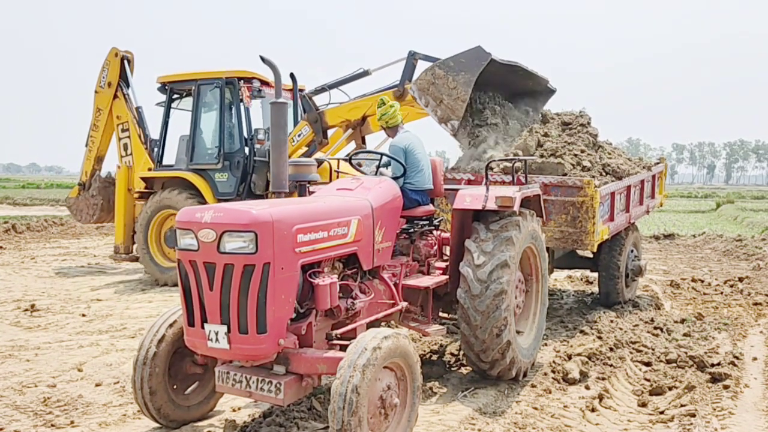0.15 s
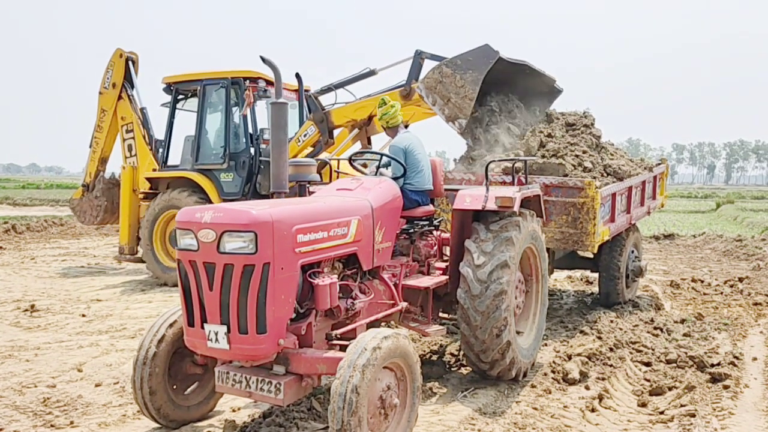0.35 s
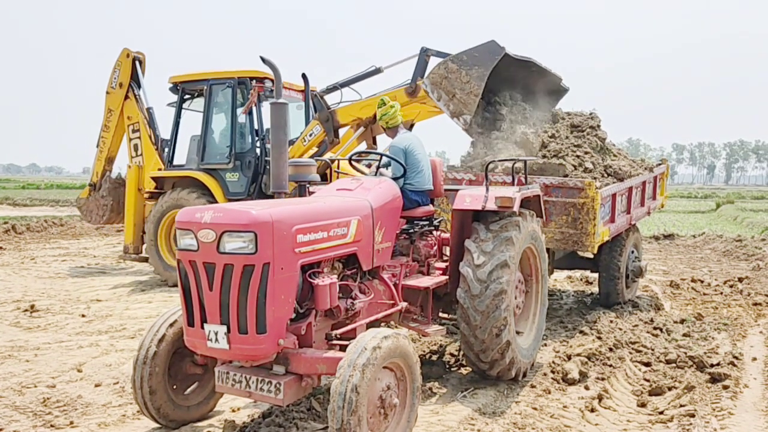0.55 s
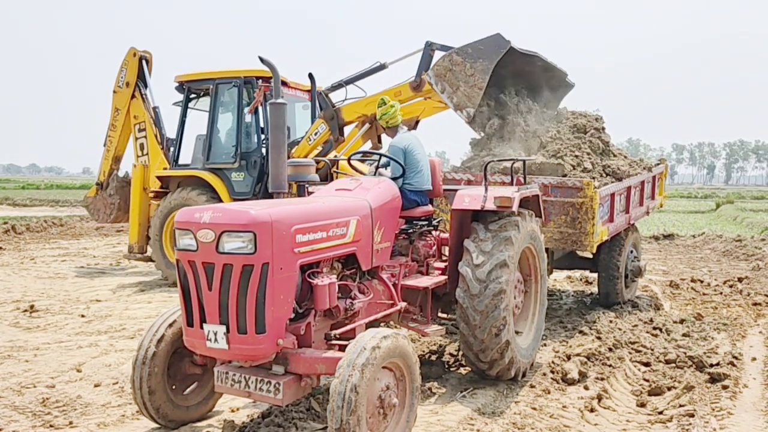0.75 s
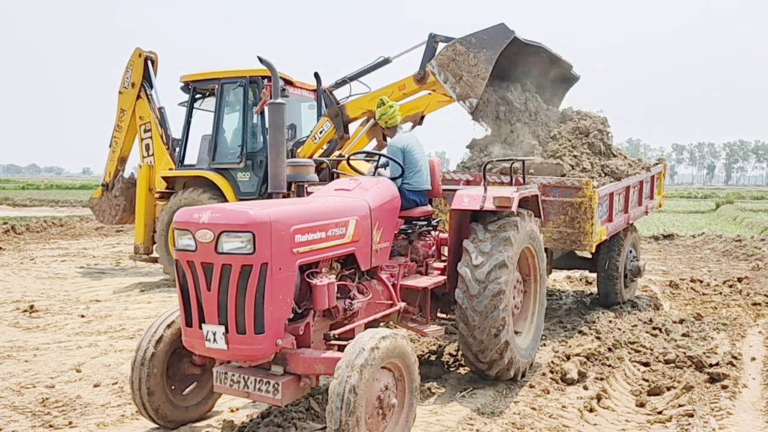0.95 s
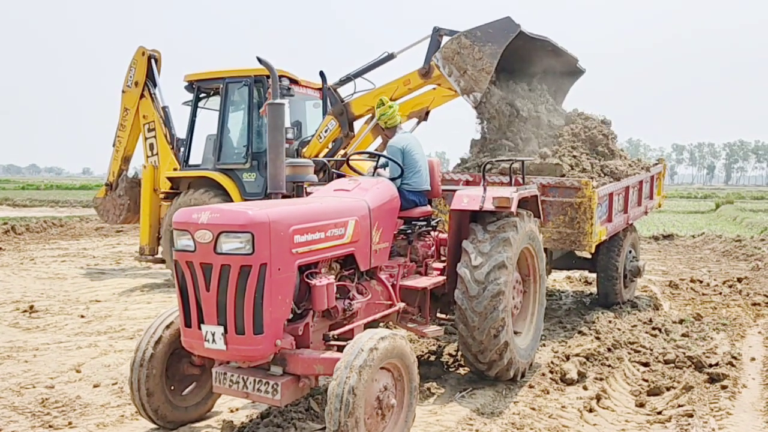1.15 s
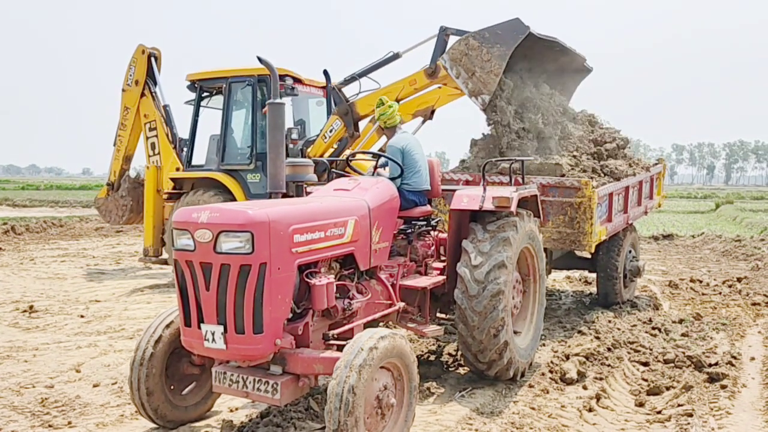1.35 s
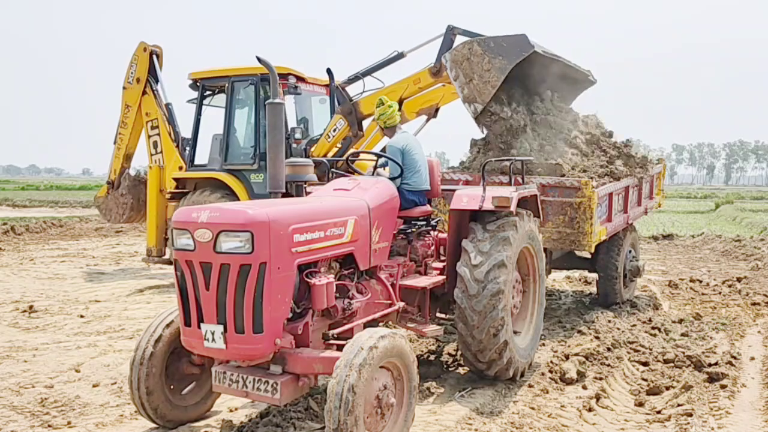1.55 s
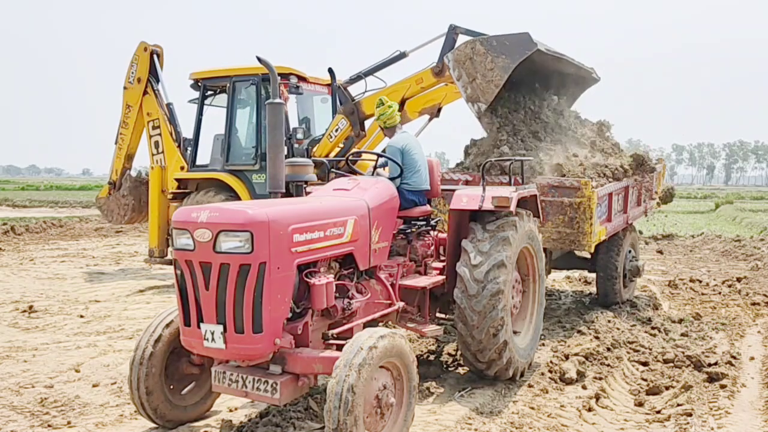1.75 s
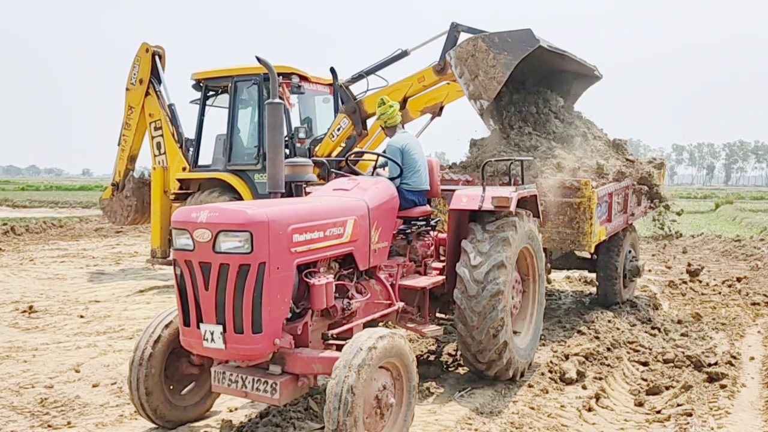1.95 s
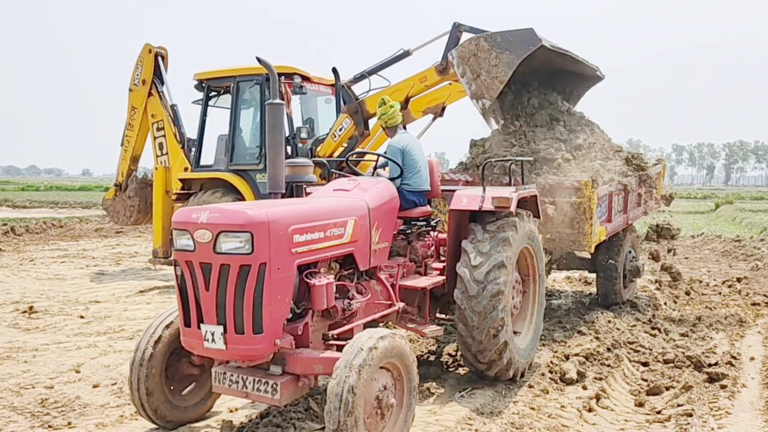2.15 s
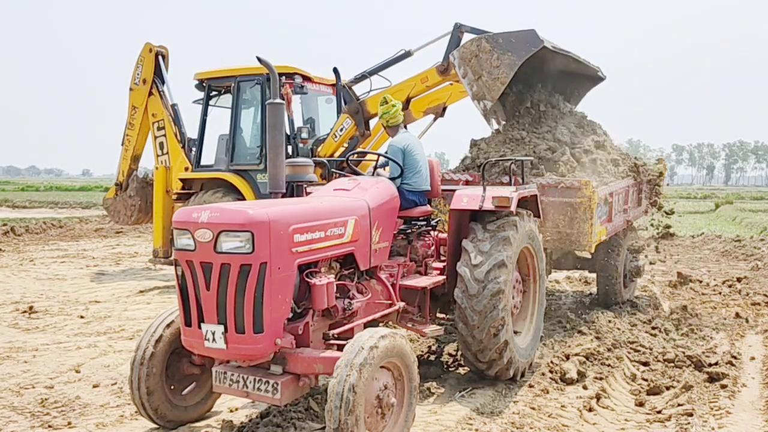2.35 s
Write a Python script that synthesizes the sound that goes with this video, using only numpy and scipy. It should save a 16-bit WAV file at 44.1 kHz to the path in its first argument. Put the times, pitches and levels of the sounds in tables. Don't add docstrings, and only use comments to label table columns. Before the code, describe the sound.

Diesel engine of a loader throbs and revs as its bucket bangs over a steel trailer

```python
import sys
import numpy as np
from scipy import signal
from scipy.fft import rfft, irfft
from scipy.io import wavfile
from scipy.ndimage import uniform_filter1d

SR = 44100
rng = np.random.default_rng(int(sys.argv[2]) if len(sys.argv) > 2 else 0)


def amplitude_ratio(level_db):
    exponent = np.asarray(level_db, float) / 20
    return 10 ** exponent


def transcribe(u):
    v = np.clip(np.atleast_2d(u).T, -1, 1)
    q = np.round(v * 32767).astype(np.int16)
    wavfile.write(sys.argv[1], SR, q)


N = 110250

# time_s, level_db
LEFT_WIND = [(0, -67), (.45, -50), (.55, -32.5), (1.45, -30), (1.55, -21.5), (1.9, -20), (2.1, -31),
             (2.3, -29.5), (2.5, -41)]
RIGHT_WIND = [(0, -41), (.21, -50), (0.237, -25), (0.408, -25), (.45, -45), (.7, -34.5), (.76, -29),
              (.84, -39), (2.5, -37.5)]
# peak_s, level_db, pitch_hz, rise_s
LEFT_PUFFS = [(0.489, -5.5, 254, 0.0016), (0.559, -13.5, 197, 0.0033), (0.636, -19.2, 247.0, 0.0015),
              (0.68, -17, 224, 0.0059), (0.718, -13, 322, 0.0011), (0.735, -26, 276.0, 0.0016),
              (0.892, -16, 263.0, 0.0017), (0.911, -15, 210, 0.0061), (0.922, -9.5, 196, 0.0026),
              (0.934, -17, 207.0, 0.0019), (0.957, -14, 237.0, 0.0015), (1.03, -24, 248.0, 0.0019),
              (1.156, -11.5, 308, 0.0031), (1.181, -17, 218, 0.0024), (1.207, -20, 264.0, 0.0013),
              (1.219, -13, 247, 0.0015), (1.268, -13.5, 283.0, 0.0026), (1.323, -11, 237.0, 0.0022),
              (1.346, -18.5, 250.0, 0.0052), (1.395, -17, 239.0, 0.0037), (1.421, -20, 241.0, 0.0031),
              (1.459, -19.4, 300.0, 0.0014), (1.478, -11.5, 311.9, 0.0024), (1.49, -15, 265.7, 0.0019),
              (1.54, -18, 271.0, 0.0019), (1.557, -8.5, 241, 0.0069), (1.59, -15.5, 260.0, 0.0046),
              (1.616, -14, 230.6, 0.0022), (1.64, -6, 330, 0.0011), (1.727, -11, 242, 0.0028),
              (1.753, -7.5, 270.0, 0.0026), (1.764, -8.5, 235.0, 0.0022), (1.796, -19, 230, 0.0035),
              (1.811, -14.5, 230, 0.0038), (1.857, -8.5, 249.0, 0.0022), (1.878, -11, 268.0, 0.0027),
              (1.896, -4, 225, 0.0034), (1.913, -15.5, 288, 0.00091), (1.936, -20, 241, 0.0024),
              (1.971, -9.5, 190, 0.0051), (1.995, -20.5, 240, 0.0031), (2.039, -18.5, 234, 0.0022),
              (2.098, -10, 222.1, 0.0032), (2.208, -14.5, 189.4, 0.0052)]
RIGHT_PUFFS = [(0.235, -24.5, 255, 0.0037), (0.249, -22.5, 329, 0.0024), (0.293, -13, 310, 0.0028),
               (0.314, -18, 221, 0.0022), (0.334, -18, 312, 0.0015), (0.35, -21, 203, 0.0021),
               (0.374, -18.5, 220, 0.0059), (0.386, -20, 238, 0.0016), (0.409, -17, 234, 0.0046),
               (0.488, -24, 219, 0.0042), (0.724, -26.9, 300, 0.0034), (0.751, -24, 238, 0.0076),
               (0.776, -33, 217, 0.0026), (1.823, -23, 209, 0.0022)]
# peak_s, level_db, pitch_hz, rise_s
THUDS = [
    (1.647, -2.5, 338, 0.0033),
    (1.664, -12, 287, 0.0034),
    (1.678, -4, 222, 0.0051),
    (1.69, -12, 232, .003),
    (1.702, -9, 239, 0.0034),
    (2.392, -18, 132, 0.0065),
]
WIND_LO_HZ, WIND_HI_HZ = 49.3, 284
LUMP_DB, LUMP_S = 2.4, 0.015
PUFF_DB, PUFF_LEAK_DB = -1.5, -29
PUFF_TAIL_RATIO, PUFF_SAG_PER_S = 1.57, 40

# start_s, level_db, t60_s, centre_hz
CLANKS = [(.187, -29, 0.15, 1290), (.29, -31, 0.1, 540), (.32, -32, 0.13, 990), (.37, -34.5, 0.11, 600),
          (.629, -35.5, 0.14, 1610), (.657, -29.5, 0.055, 1800), (0.686, -30, .05, 2500),
          (.711, -19.5, 0.044, 620), (.74, -24, 0.049, 1040), (0.894, -26.5, 0.069, 1000),
          (1.462, -21.5, 0.077, 1140), (1.486, -24.5, 0.09, 1350), (1.508, -31, 0.079, 960),
          (1.654, -13.5, 0.082, 1120), (1.659, -12.5, 0.2, 443), (1.69, -22.5, 0.36, 493),
          (1.675, -20, 0.18, 400), (1.723, -25, 0.14, 500), (1.764, -22.5, 0.084, 1060),
          (2.39, -34, 0.19, 905)]
CLANK_SLOPE_DB, CLANK_RISE_S = -4.5, 0.0048
TREBLE_DB, BRIGHT_DB_PER_OCT = -27.5, 7.5
# start_s, level_db
PLATE_HITS = [
    (1.465, -11.5),
    (1.487, -43),
    (1.655, 0.5),
    (1.766, -22),
]
# mode_hz, level_db, t60_s
PLATE_MODES = [(192.7, 0, 0.26), (269, -1, 0.31), (367, -6, 0.25), (528, -13, 0.85), (734, -6.5, 0.16),
               (898, -13.5, 0.64), (1090, -1, 0.06), (1240, -6, 0.14), (1345, -7.5, 0.14),
               (1524, -16.5, 0.18), (1713, -22, 0.12), (2120, -35, 0.8), (2740, -45, 0.12),
               (2993, -30, 0.024)]
PLATE_DB, PLATE_RISE_S, THIN_HZ = -12, 0.014, 700
LONGEST_T60_S = 0.33
# peak_s, level_db, pitch_hz
PINGS = [(0.197, -35, 887), (0.335, -32, 1038), (0.621, -30.2, 920), (0.633, -38, 910), (0.664, -32, 924),
         (0.69, -28, 917), (0.717, -40, 990), (0.737, -31, 970), (0.792, -34, 946), (0.815, -31.5, 949),
         (0.846, -28.5, 950), (0.875, -30, 957.2), (0.892, -33, 957), (0.927, -28, 970),
         (0.948, -35.1, 950), (1.009, -32, 964), (1.032, -26, 954), (1.053, -34, 947.4), (1.087, -30, 946),
         (1.137, -28.5, 947.7), (1.19, -24, 945), (1.241, -22.5, 940), (1.291, -35.4, 940.4),
         (1.319, -31, 953), (1.358, -31.5, 956), (1.512, -29.5, 940), (1.772, -33.5, 1840),
         (1.78, -30, 1190), (1.837, -29.5, 926), (2.07, -36.5, 726), (2.24, -33, 690)]
PING_DB, PING_RISE_S, PING_FALL_S = -0.5, 0.0048, 0.0056

# time_s, firing_hz, exhaust_db
ENGINE = [(0.0, 32.8, -38.5), (0.19, 33.1, -34), (0.29, 33.2, -34.5), (0.61, 35.7, -32.5),
          (0.85, 39.6, -32), (0.98, 37.8, -32), (1.38, 38.8, -34), (1.63, 37.6, -40), (1.82, 38.2, -35),
          (2.09, 39.2, -37.5), (2.42, 34.6, -44.5), (2.5, 33, -32.5)]
# time_s, load_db
LOAD = [(0, -8), (.585, -7), (.61, 0.5), (.95, -1), (1.05, -2.5), (1.23, 0), (1.36, -3.5), (1.42, -5.5),
        (1.52, -2.5), (1.62, -3.5), (1.82, 0.5), (2.0, -8), (2.5, -8.5)]
# firing_order, level_db, phase_rad
EXHAUST = [(1, -1.5, 1.5), (2, -5.5, -4.5), (3, 1, 0.5), (4, -9.5, 2), (5, -12.5, 5), (6, -11.5, 7)]
START_RAD, WAVER_DB = -0.472, 2.3
# mode_hz, width_hz, level_db
BLOCK = [(344, 33, -1.5), (554, 78, -1.5), (726.7, 27, -8.5), (940, 53, -1.5), (1140.6, 74, -3.5),
         (1482, 27, -15.5), (1700, 145, -17.5), (2080, 430, -15), (2724, 100, -17)]
LOAD_SHARE = [0.96, 1.43, 0.56, 1.2, 1.36, 0.4, 1.13, 0.32, 2.5]
KNOCK_DB, KNOCK_TURN, KNOCK_S, GAP_DB = -37.5, 0.35, 0.0059, 3
WEAK_DB, UNEVEN_DB = 3.5, 1.2
STRIKE_DB, STRIKE_JITTER_TURN = -1, 0.02
# freq_hz, level_db
DRONE = [(15, -20), (25, -20), (102, -7.5), (130, -6), (221, -16), (358, -6), (391, -13.5), (607, -15.5),
         (4800, -30), (6240, -85), (10600, -120)]
# freq_hz, level_db
HISS = [(2500, 2), (3100, -31), (4600, -26), (5100, 0.5), (8250, -1.5), (8500, -12.5), (10300, -18),
        (14000, -28.5)]
DRONE_DB, HISS_DB = -37.5, -46.5
DRONE_LOAD_SHARE, HISS_LOAD_SHARE = 0.3, 0.34
HISS_PULSE_DB, SWELL_DB = 2.5, 1.3

# freq_hz, left_minus_right_db
BALANCE = [(60, 13.5), (180, 13), (520, 10.5), (1550, 7), (4580, 2.5), (8500, -1.5), (13600, 4.5)]
# freq_hz, shared_fraction
LIKENESS = [(40, .9), (300, .85), (1000, .8), (2500, .55), (6000, .35), (9000, .15), (14000, .1)]
LEFT_LAG_S = 0.00009


def evened(x):
    return x / np.sqrt(np.mean(x ** 2) + 1e-20)


def read(points, hz):
    f, value = np.transpose(points)
    return np.interp(np.log(hz + 1), np.log(f + 1), value)


def curve(rows, column=1):
    columns = np.transpose(rows)
    return np.interp(np.arange(N) / SR, columns[0], columns[column])


def slow(seconds, count=N):
    size = max(int(seconds * SR), 2)
    once = uniform_filter1d(rng.standard_normal(count), size)
    return evened(uniform_filter1d(once, size))


def colour(x, db, lag_s=0):
    hz = np.fft.rfftfreq(len(x), 1 / SR)
    lag_rad = np.minimum(2 * np.pi * hz * lag_s, np.pi)
    return irfft(rfft(x) * amplitude_ratio(db(hz)) * np.exp(-1j * lag_rad), len(x))


def resonate(x, hz, width_hz):
    r = np.exp(-np.pi * abs(width_hz) / SR)
    turn_rad = 2 * np.pi * hz / SR
    ring = signal.lfilter([1 - r], [1, -2 * r * np.cos(turn_rad), r * r], x)
    return ring * 2 * np.sin(turn_rad)


def swell(t, rise_s, fall_s):
    return np.exp(-0.5 * (t / np.where(t < 0, rise_s, fall_s)) ** 2)


def add(mix, start_s, sound):
    part = mix[round(start_s * SR):][:len(sound)]
    part += sound[:len(part)]


def turbulence(level):
    def shape(hz):
        low_cut = -10 * np.log10(1 + (WIND_LO_HZ / (hz + 8)) ** 3.6)
        return low_cut - 10 * np.log10(1 + (hz / WIND_HI_HZ) ** 4.67)

    noise = evened(colour(rng.standard_normal(N), shape))
    return noise * amplitude_ratio(curve(level) + LUMP_DB * slow(LUMP_S))


def wind():
    out = np.array([turbulence(level) for level in (LEFT_WIND, RIGHT_WIND)])
    t = np.arange(-0.04, 0.04, 1 / SR)
    puffs = np.zeros((2, N))
    for port, rows in zip(puffs, (LEFT_PUFFS + THUDS, RIGHT_PUFFS)):
        for (peak_s, db, hz, rise_s), turn in zip(rows, rng.random(len(rows))):
            eddy = np.sin(2 * np.pi * (hz * t * (1 - PUFF_SAG_PER_S * t / 2) + turn))
            envelope = swell(t, rise_s, PUFF_TAIL_RATIO * rise_s)
            add(port, peak_s - 0.04, amplitude_ratio(db + PUFF_DB) * eddy * envelope)
    return out + puffs + amplitude_ratio(PUFF_LEAK_DB) * puffs[::-1]


def pings():
    out = np.zeros(N)
    t = np.arange(-0.03, 0.05, 1 / SR)
    for (peak_s, db, hz), turn in zip(PINGS, rng.random(len(PINGS))):
        tone = np.sin(2 * np.pi * (hz * t + turn))
        add(out, peak_s - 0.03, amplitude_ratio(db + PING_DB) * swell(t, PING_RISE_S, PING_FALL_S) * tone)
    return out


def steel():
    out = np.zeros(N)
    t = np.arange(SR // 2) / SR
    for start_s, hit_db in PLATE_HITS:
        ring = np.zeros(len(t))
        for hz, mode_db, t60_s in PLATE_MODES:
            level_db = mode_db + hit_db * min(THIN_HZ / hz, 3)
            decay_db = -60 * t / min(t60_s, LONGEST_T60_S)
            turns = hz * rng.uniform(0.98, 1.007) * t + rng.random()
            ring += amplitude_ratio(level_db + decay_db) * np.sin(2 * np.pi * turns)
        add(out, start_s, amplitude_ratio(PLATE_DB) * ring * np.minimum(t / PLATE_RISE_S, 1))
    return out


def clanks():
    out = np.zeros(N)
    t = np.arange(12000) / SR
    for start_s, db, t60_s, centre_hz in CLANKS:
        def shape(hz):
            skirt_db = CLANK_SLOPE_DB * 2.02 * abs(np.log2((hz + 20) / centre_hz))
            floor_db = TREBLE_DB + BRIGHT_DB_PER_OCT * np.log2(centre_hz / 500)
            top_cut_db = (hz > 8400) * (14 + 0.0025 * (hz - 8400))
            return np.maximum(skirt_db, floor_db) - top_cut_db

        burst = evened(colour(rng.standard_normal(len(t)), shape))
        add(out, start_s, burst * np.minimum(t / CLANK_RISE_S, 1) * amplitude_ratio(db - 60 * t / t60_s))
    return out


def firing():
    return np.cumsum(curve(ENGINE)) / SR + START_RAD / (2 * np.pi)


def knock_gate():
    turns = firing() - KNOCK_TURN + 1.56
    cycle = turns.astype(int)
    size_db = WEAK_DB * (cycle % 2) + UNEVEN_DB * rng.standard_normal(128)[cycle]
    from_peak_s = (turns % 1 - 0.5) / curve(ENGINE)
    return amplitude_ratio(size_db) * np.exp(-0.5 * (from_peak_s / KNOCK_S) ** 2)


def wash(gate):
    drone = evened(colour(rng.standard_normal(N), lambda hz: read(DRONE, hz)))
    hiss = evened(colour(rng.standard_normal(N), lambda hz: read(HISS, hz) - 30 * (hz < 2500)))
    pulse_db = HISS_PULSE_DB * np.minimum(gate, 1.5) + SWELL_DB * slow(0.097)
    load_db = curve(LOAD)
    drone_db = DRONE_DB + DRONE_LOAD_SHARE * load_db + 1.244 * pulse_db
    hiss_db = HISS_DB + HISS_LOAD_SHARE * load_db + pulse_db
    return amplitude_ratio(drone_db) * drone + amplitude_ratio(hiss_db) * hiss


def block(gate):
    tops = signal.find_peaks(gate)[0]
    jitter = STRIKE_JITTER_TURN * SR / 38 * rng.standard_normal(128)[:len(tops)]
    at = tops - 200 + jitter.astype(int)
    strikes = np.zeros(N)
    strikes[np.clip(at, 0, N - 1)] = gate[tops]
    rattle = evened((gate + amplitude_ratio(GAP_DB)) * rng.standard_normal(N))
    drive = rattle + amplitude_ratio(STRIKE_DB) * evened(strikes)
    out = np.zeros(N)
    for (hz, width_hz, db), share in zip(BLOCK, LOAD_SHARE):
        ring = evened(resonate(resonate(drive, hz, width_hz), hz, width_hz))
        out += amplitude_ratio(KNOCK_DB + db + share * curve(LOAD)) * ring
    return out


def exhaust():
    turns = firing()
    orders = np.zeros(N)
    for order, db, rad in EXHAUST:
        orders += amplitude_ratio(db + WAVER_DB * slow(0.031)) * np.cos(2 * np.pi * order * turns + rad)
    return np.sqrt(2) * amplitude_ratio(curve(ENGINE, column=2)) * orders


def ports(near, other):
    def same(hz):
        return np.clip(read(LIKENESS, hz), 0.05, 0.99)

    def half_db(hz):
        return read(BALANCE, hz) / 2

    right = colour(near, lambda hz: 20 * np.log10(same(hz)) - half_db(hz))
    right += colour(other, lambda hz: 10 * np.log10(1 - same(hz) ** 2) - half_db(hz))
    return np.array([colour(near, half_db, LEFT_LAG_S), right])


def scene():
    gate = knock_gate()
    machine = [block(gate) + wash(gate) + clanks() for _ in range(2)]
    solid = exhaust() + steel() + pings()
    return ports(machine[0] + solid, machine[1] + solid) * amplitude_ratio(-0.5) + wind()


def band_limit(x):
    return signal.sosfilt(signal.butter(12, 14150, fs=SR, output="sos"), x)


def record(dry):
    x = signal.sosfilt(signal.butter(1, 12, "high", fs=SR, output="sos"), dry)
    mix = np.tanh(x / 1.256) * 1.147
    return band_limit(mix)


dry = scene()
out = record(dry)
transcribe(out)
```